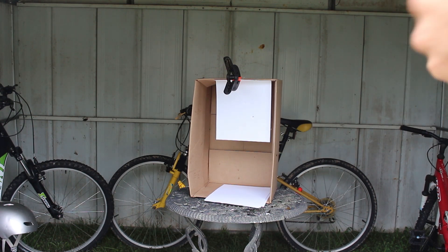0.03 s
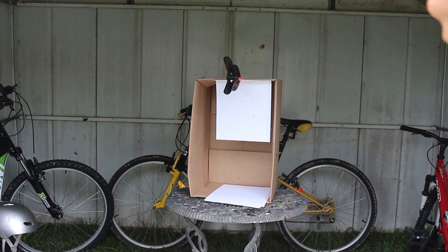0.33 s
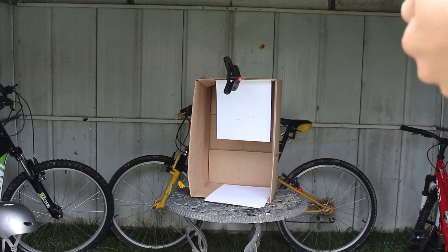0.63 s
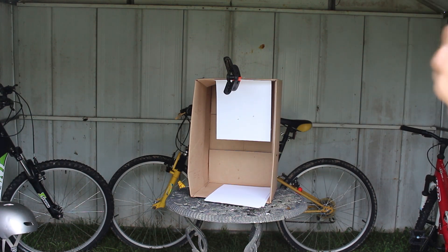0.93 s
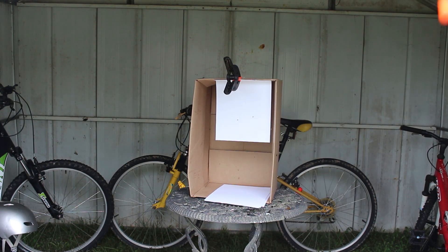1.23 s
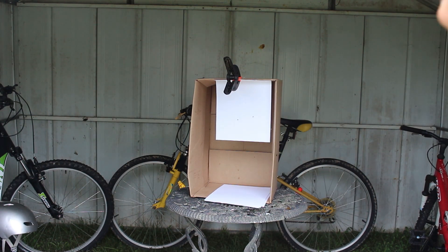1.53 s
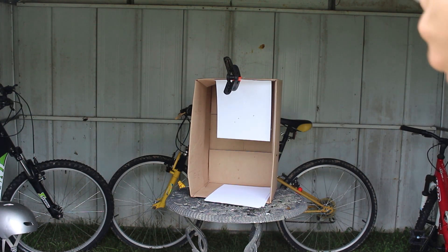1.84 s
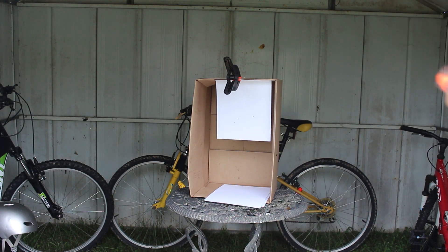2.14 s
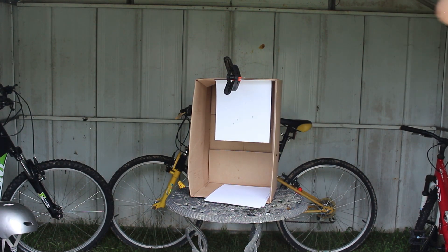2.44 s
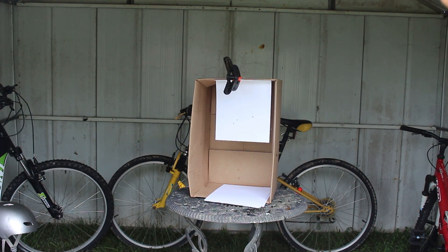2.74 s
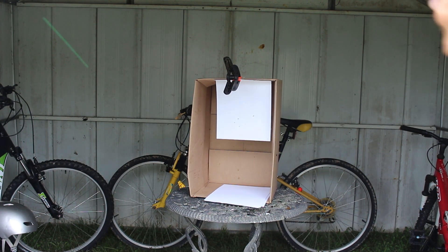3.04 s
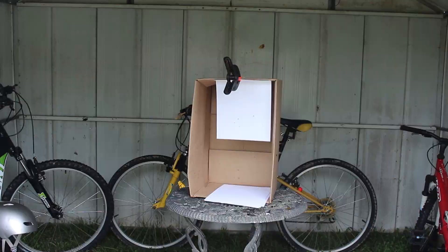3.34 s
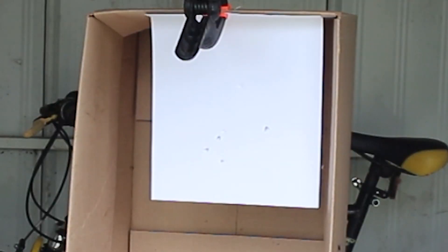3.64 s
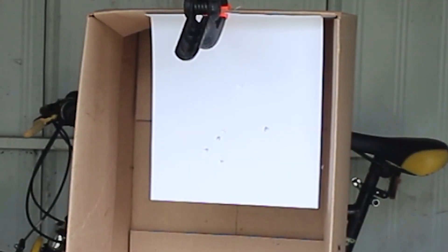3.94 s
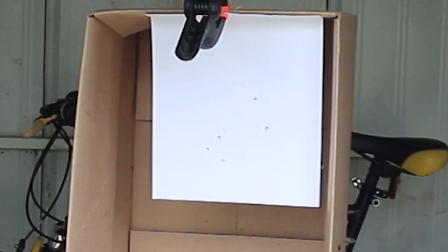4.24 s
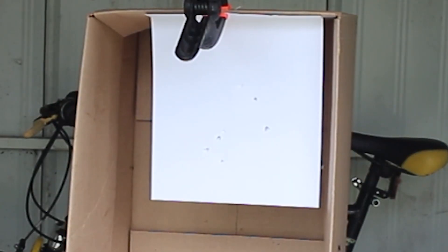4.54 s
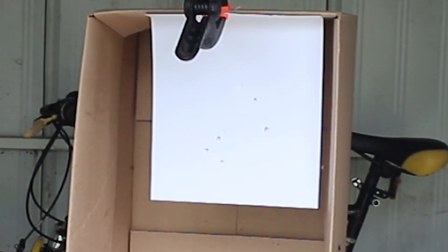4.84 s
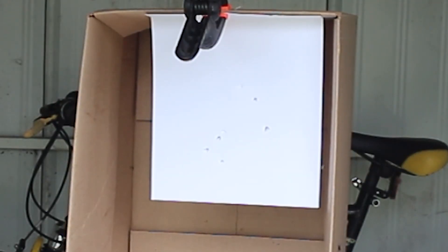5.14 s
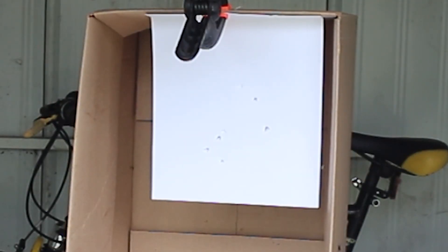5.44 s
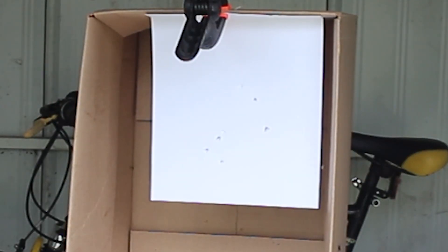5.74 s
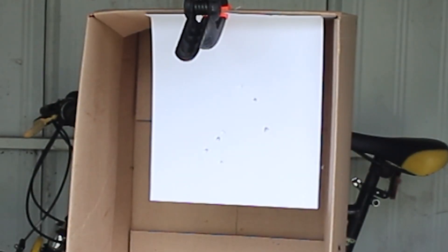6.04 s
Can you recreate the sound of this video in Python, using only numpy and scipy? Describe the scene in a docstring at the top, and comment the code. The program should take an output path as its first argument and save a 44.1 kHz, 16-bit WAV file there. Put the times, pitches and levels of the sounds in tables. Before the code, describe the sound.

A spring BB pistol snaps five times at a steady pace near the microphone, with the plastic clack of its slide being racked after each shot. A few metres away, four pellets crack through paper and cardboard, lightly ringing a metal shed wall. Handling clicks, brief hisses and a small ting fall in between, and the spring buzzes slightly. Low, uneven wind buffeting runs throughout, over a faint outdoor background.

```python
"""Wind buffets the microphone; then, close by, a spring BB pistol fires five times at a paper target in a
cardboard box before a metal shed. Each shot is a pair of impacts: the sear snaps and the piston slams.
Four pellets smack through the box and excite the modes of the shed wall. After each shot the slide is
racked back and rattles home, among small clicks, short hisses and one metallic ting. The ground and wall
reflect these sounds over a faint outdoor background."""
import sys
import numpy as np
from scipy import signal
from scipy.fft import rfft, irfft, next_fast_len
from scipy.io import wavfile
from scipy.ndimage import uniform_filter1d

SR = 44100
rng = np.random.default_rng(int(sys.argv[2]) if len(sys.argv) > 2 else 0)


def wav_record(signal):
    """Record a signal, one row per channel, as 16-bit PCM in the file named by sys.argv[1]."""
    frames = np.transpose(np.atleast_2d(signal))
    bounded = np.clip(frames, -1, 1)
    # unit amplitude maps onto the largest positive 16-bit level
    quanta = np.round(bounded * 32767).astype(np.int16)
    wavfile.write(sys.argv[1], SR, quanta)


N = 273507
TIME = np.arange(N) / SR
AGE = TIME[:SR]  # seconds since the start of an event

# Piston slams. Each row: start in seconds, level in dB.
PISTON_SLAMS = [(0.596, -5), (1.7495, -5.5), (2.9081, -3.5), (4.056, -3.5), (5.227, -2)]
# Spectrum of a shot. Each row: frequency in Hz, gain in dB.
SHOT_SPECTRUM = [(120, -35.5), (200, -4.5), (590, -8), (1060, 1), (2090, -4), (2650, -15), (3020, -5.5),
                 (4040, -8.5), (4430, -4.5), (5840, -12), (6280, -18.5), (7540, -3.5), (10300, -18.5),
                 (13300, -16), (16000, -25.5)]
def shots(flight_s=.0035, snap_db=-11, slam_db=-1):
    """Impact excitation: the sear snaps, the piston flies and slams home, much alike at every shot."""
    out = np.zeros(N)
    snap, slam = burst(.0004, .041), burst(.0025, .009)
    for s, db in PISTON_SLAMS:
        add(out, s - flight_s, undb(db + snap_db) * (snap + .15 * burst(.00052, .0085)))
        add(out, s, undb(db + slam_db) * (slam + .28 * burst(.0018, .015)))
    return colour(out, SHOT_SPECTRUM)


# Pellet blows, on the target and then behind it. Each row: start in seconds, level in dB, wall level in dB.
PELLET_HITS = [(0.6275, -7, -2.5), (.634, -10, -3), (1.7816, -10, 4.5), (1.7872, -12, -6), (2.9419, -9, 5),
               (2.9487, -9, 1), (4.0893, -7.5, -20), (4.093, -11, -7)]
# Spectrum of a pellet blow. Each row: frequency in Hz, gain in dB.
HIT_SPECTRUM = [(120, -17), (350, 3), (620, -2.5), (930, 3), (1300, 1), (2400, -0.5), (2950, 0), (3800, -2),
                (6500, -6), (8700, -3), (10300, -14.5), (12500, -11.5), (16000, -20.5)]
# Modes of the shed wall. Each row: frequency in Hz, level in dB.
SHED_MODES = [(947.5, -66), (1922, -66), (2105, -73.5), (2164, -64.5), (2326, -71), (2374, -81),
              (2439, -69.5)]
def pellets(box_db=-12, rattle_db=-22, ring_db=16, ring_t60=.9):
    """Damping: struck cardboard cracks and shudders briefly, while the sheet wall rattles and rings on."""
    impacts, wall = np.zeros(N), np.zeros(N)
    for s, db, wall_db in PELLET_HITS:
        add(impacts, s, undb(db) * (burst(.00069, .0046) + undb(box_db) * burst(.002, .051)))
        add(impacts, s, undb(wall_db + rattle_db) * fade(.21) * rng.standard_normal(SR))
        for hz, mode_db in SHED_MODES:
            # each blow finds slightly different neighbours among the panel's many modes
            pitch = hz * (1 + .006 * rng.standard_normal())
            mode = fade(ring_t60) * np.sin(2 * np.pi * pitch * AGE)
            add(wall, s, undb(wall_db + ring_db + mode_db) * mode)
    return colour(impacts, HIT_SPECTRUM) + wall


# The slide at its back stop. Each row: start in seconds, level in dB, relative catch level in dB,
# frame resonance in Hz, tilt in dB per octave.
SLIDE_STOPS = [(1.1624, -17, -32, 1470, 1.5), (2.268, -8.5, -14.5, 5840, 0.5), (3.464, -6, -14, 4750, 0),
               (4.583, -4.5, -27, 1380, 0.5), (5.692, -12.5, -42, 4530, 3), (5.8801, -4.5, -14, 2550, 3)]
# Spectrum of the stop. Each row: frequency in Hz, gain in dB.
STOP_SPECTRUM = [(200, -27), (750, -12), (1400, -1.5), (2400, -3), (3200, -6.5), (5200, -4.5), (7000, -12),
                 (8700, -9), (10500, -16), (13000, -13), (16000, -22)]
def slide_stops(lead_s=.0046, frame_q=4, frame_db=1):
    """Resonance: after a light catch the slide hits its stop; the grip decides which frame mode rings."""
    out = np.zeros(N)
    for s, db, catch_db, hz, tilt in SLIDE_STOPS:
        impact = burst(.0013, .011)
        blow = impact + undb(frame_db) * resonate(impact, hz, frame_q)
        add(out, s - lead_s, undb(db + catch_db) * colour(burst(.00068, .02), STOP_SPECTRUM, tilt))
        add(out, s, undb(db - 2) * colour(blow, STOP_SPECTRUM, tilt))
    return out


# The slide running home. Each row: start in seconds, level in dB, latch delay in seconds,
# relative latch level in dB.
SLIDE_RETURNS = [(2.4269, -17, 0.019, 5), (3.6309, -14, .02, -4), (4.749, -12.5, .019, 3),
                 (6.046, -8, 0.023, -5)]
# Spectra of its knocks and scrapes. Each row: frequency in Hz, gain in dB.
KNOCK_SPECTRUM = [(200, -14), (800, -14), (1250, 1.5), (1600, 1), (2100, -1), (3000, -12), (5000, -11),
                  (8500, -14.5), (11000, -29.5), (16000, -25.5)]
SCRAPE_SPECTRUM = [(300, -10), (1500, 4), (3000, -0.5), (5500, -2), (7200, -4), (9000, 5.5), (10500, -7),
                   (13000, -5.5), (16000, -22.5)]
def slide_returns(scrape_lag_s=.012, scrape_db=-3):
    """Impact and sliding friction: the slide knocks a pellet into the breech, scrapes on and latches."""
    knocks, scrapes = np.zeros(N), np.zeros(N)
    for s, db, latch_lag, latch_db in SLIDE_RETURNS:
        add(knocks, s, undb(db - 5) * burst(.00048, .032))
        add(knocks, s + latch_lag, undb(db + latch_db - 2.5) * burst(.0014, .013))
        add(scrapes, s - .0025, undb(db - 17.5) * burst(.024, .08))
        add(scrapes, s + scrape_lag_s, undb(db + scrape_db) * burst(.0011, .018))
    return colour(knocks, KNOCK_SPECTRUM) + colour(scrapes, SCRAPE_SPECTRUM)


# The slide drawn back. Each row: start and length in seconds, rubbing level in dB, catch level in dB.
SLIDE_DRAWS = [(1.052, .108, -50, -26.5), (2.171, 0.09, -46.5, -27), (3.336, 0.13, -49.5, -25),
               (4.467, 0.14, -37, -25), (5.74, 0.15, -43, -19)]
def slide_draws(roughness_db=5):
    """Stick-slip friction: plastic rubs on plastic in a dense run of small catches and slips."""
    out = np.zeros(N)
    for s, length, db, _ in SLIDE_DRAWS:
        slips = undb(roughness_db * np.repeat(rng.standard_normal(SR), 60))[:SR]
        stroke = np.sin(np.pi * np.minimum(AGE / length, 1)) ** .5
        add(out, s, undb(db) * stroke * unit(slips * rng.standard_normal(SR)))
    return colour(out, KNOCK_SPECTRUM)


# Catches passed on every draw. Each row: fraction of the stroke, relative level in dB, treble in dB.
SLIDE_CATCHES = [(0, -5, -22), (0.356, -1, -9.5), (0.481, 1, -14), (.82, -7.5, -11)]
# Clicks of the gun in the hand. Each row: start in seconds, level in dB, treble in dB.
HAND_CLICKS = [(1.313, -28, -16), (1.329, -20, 0), (1.341, -20.5, -23), (1.564, -37, -14),
               (4.2957, -29, -8.5), (5.3991, -30.5, -13.5)]
def clicks(click_db=-7, trigger_lead_s=.063, trigger_db=-32.5, trigger_treble_db=-23):
    """Contact transients: the trigger ticks before each shot, the slide at catches, the gun in the hand."""
    out = np.zeros(N)
    triggers = [(s - trigger_lead_s, trigger_db, trigger_treble_db) for s, _ in PISTON_SLAMS]
    catches = [(s + share * length, draw_db + db, treble_db)
               for s, length, _, draw_db in SLIDE_DRAWS for share, db, treble_db in SLIDE_CATCHES]
    for s, db, treble_db in triggers + catches + HAND_CLICKS:
        add(out, s, undb(db + click_db) * tick(treble_db))
    return out


def handling(from_s=3.8, to_s=6.1, count=12, tick_db=-46, spread_db=3):
    """Random impulses: faint ticks come as the grip shifts."""
    out = np.zeros(N)
    for when, size in rng.uniform(size=(count, 2)):
        s = from_s + when * (to_s - from_s)
        add(out, s, undb(tick_db + spread_db * (2 * size + .5)) * tick(treble_db=-17))
    return out


def tick(treble_db):
    """A damped impact of small plastic parts, dull or bright."""
    top = treble_db - 1
    spectrum = [(600, -12), (1500, -2), (2200, -8), (5000, top), (9000, top - 2), (16000, top - 12)]
    return colour(burst(.0024, .011), spectrum)


# Buzz of the mainspring. Each row: frequency in Hz, gain in dB.
COIL_SPECTRUM = [(900, -14), (1700, 1.5), (2600, -8), (4000, -5.5), (5400, 3), (6400, -0.5), (7300, -10.5),
                 (8600, 3), (10000, -16.5), (13000, -9), (16000, -11.5)]
def mainspring(blows, buzz_db=-19, empty_db=3.5, sing_hz=5350, sing_q=9, sing_db=-3):
    """Travelling waves: blows run up and down the coils, which buzz and, once the gun is empty, sing."""
    empty = TIME > PISTON_SLAMS[-1][0]
    sing = unit(resonate(rng.standard_normal(N), sing_hz, sing_q))
    coils = noise(COIL_SPECTRUM) + undb(sing_db) * empty * sing
    return undb(buzz_db + empty_db * empty) * scatter(blows, coils, t60=.35)


def cavity(blows, hz, q, db, t60):
    """Cavity resonance: enclosed air booms briefly after each blow."""
    resonance = unit(resonate(rng.standard_normal(N), hz, q))
    return undb(db) * scatter(blows, resonance, t60)


# Short hisses. Each row: start in seconds, level in dB, t60 and length in seconds, tilt in dB per octave.
HISS_EVENTS = [(0.653, -25, 0.41, 0.077, -1), (1.131, -36.5, 1.4, 0.081, 0.5),
               (1.319, -34.5, 0.52, 0.091, 1.5), (1.426, -28.5, 0.28, 0.13, 4),
               (2.028, -27.5, 0.57, 0.12, 0.5), (2.558, -26, .23, 0.06, 7), (2.761, -35, 0.42, 0.13, 2),
               (2.991, -28, 0.48, 0.089, -1.5), (4.162, -35, 0.36, 0.014, -1.5)]
# Spectrum of a hiss, and of the ting's strike and rattle. Each row: frequency in Hz, gain in dB.
HISS_SPECTRUM = [(300, -8.5), (900, 3), (1500, 3), (3000, 3.5), (6000, 0.5), (8700, 1.5), (10500, -7.5),
                 (13000, -6), (16000, -14.5)]
def hisses(rise_s=.0037, close_t60=.2):
    """Gated broadband noise: each hiss opens quickly, sinks and then closes."""
    out = np.zeros(N)
    for s, db, t60, length, tilt in HISS_EVENTS:
        envelope = gate(rise_s, length, close_t60) * fade(t60)
        add(out, s, undb(db) * envelope * colour(rng.standard_normal(SR), HISS_SPECTRUM, tilt))
    return out


# Modes of a small metal object. Each row: frequency in Hz, level in dB.
METAL_MODES = [(2239, -29), (2420, -42), (5168, -54), (5776, -44.5), (8250, -26), (8613, -25.5),
               (9620, -34), (11456, -30), (12263, -49), (13587, -49)]
def ting(s=1.916, strike_db=-9, ring_db=1, rattle_db=-21):
    """Beating: something small and metallic is struck, rattles and rings briefly in close mode pairs."""
    out = np.zeros(N)
    add(out, s, undb(strike_db) * colour(burst(.000067, .0012), HISS_SPECTRUM))
    add(out, s, undb(rattle_db) * fade(.23) * colour(rng.standard_normal(SR), HISS_SPECTRUM, tilt=2))
    for hz, db in METAL_MODES:
        pair_hz = hz * (1 + .012 * rng.standard_normal((2, 1)))
        beating = np.sin(2 * np.pi * pair_hz * AGE).sum(axis=0)
        add(out, s, undb(ring_db + db) * fade(.17) * beating)
    return out


# Early reflections. Each row: delay in seconds, gain in dB.
REFLECTIONS = [(.0068, -19.5), (0.0187, -24)]
# Spectra of the bright tail and the lingering tail. Each row: frequency in Hz, gain in dB.
BRIGHT_SPECTRUM = [(200, -4.5), (900, -5), (2000, -2), (5500, 0.5), (9000, 3.5), (16000, -1)]
LINGER_SPECTRUM = [(200, -7), (900, 9), (2400, 8), (4000, 3), (8700, -12), (10500, -18.5), (16000, -34)]
def yard(gun, far, bright_db=-13, linger_db=-20, far_db=-3):
    """Reflection: ground and wall echo the gun; a bright tail dies quickly and a duller one lingers."""
    early = sum(undb(db) * np.interp(TIME - lag, TIME, gun, left=0) for lag, db in REFLECTIONS)
    response = colour(rng.standard_normal(SR), BRIGHT_SPECTRUM) * fade(.2) * np.minimum(AGE / .0087, 1)
    bright = signal.fftconvolve(gun, unit(response) / np.sqrt(SR))[:N]
    linger = scatter(gun + undb(far_db) * far, noise(LINGER_SPECTRUM), t60=.47)
    return early + undb(bright_db) * bright + undb(linger_db) * linger


# Gusts. Each row: start and length in seconds, strength in dB, flutter offset in dB, t60 in seconds.
WIND_GUSTS = [(0.0, .17, -8.5, 3, .7), (0.316, 0.058, -7.5, 1, .3), (0.693, 0.27, -13.5, -1.5, .5),
              (0.944, .2, -7, 0.5, 0.15), (1.193, 0.072, -9, 2, 0.44), (1.888, .13, -10.5, -1, 0.65),
              (2.16, 0.27, -14.5, 0.5, 0.11), (2.577, 0.047, -7.5, -1, 0.59), (2.783, .11, -17, 6.5, 0.15),
              (3.084, .2, -16.5, -4, 0.54), (3.346, .11, -6.5, -4, 0.08), (3.488, 0.25, -11, -8, .3),
              (3.81, .05, -16, -5, .3), (3.986, 0.047, -13.5, -7, 0.31), (4.151, .11, -6, -8, 1),
              (4.57, 0.099, -26, 9.5, 0.75), (4.987, 0.23, -8, -1, 0.17), (5.331, 0.034, -17.5, 7.5, 0.62),
              (5.565, 0.22, -21.5, -7.5, 0.2), (6.04, 0.13, -12.5, -10, 0.18)]
# Spectra of large and small eddies. Each row: frequency in Hz, gain in dB.
RUMBLE_SPECTRUM = [(8.8, -34), (15, 7.5), (38, 0), (76, -2), (132, -9.5), (260, -30.5), (340, -59),
                   (570, -120)]
FLUTTER_SPECTRUM = [(90, -14.5), (170, 10), (250, 2.5), (400, -10), (600, -23.5), (1000, -41.5),
                    (2000, -70.5), (5000, -81.5)]
def wind(breeze_db=-28.5, breeze_flutter_db=-62, flutter_db=-8, buffet_db=3, rise_s=.04, deep_hz=70):
    """Turbulence: gusts rise from a breeze; large eddies rumble on the microphone, small ones flutter."""
    rumble_gain, flutter_gain = np.full(N, undb(breeze_db)), np.full(N, undb(breeze_flutter_db))
    for s, length, db, rough_db, t60 in WIND_GUSTS:
        strength = undb(db) * gate(rise_s, length, t60)
        add(rumble_gain, s, strength)
        add(flutter_gain, s, undb(flutter_db + rough_db) * strength ** 1.472)  # grows faster than rumble
    # smooth air holds only the deepest eddies
    eddies = noise(RUMBLE_SPECTRUM)
    deep = signal.sosfiltfilt(signal.butter(2, deep_hz, fs=SR, output="sos"), eddies)
    turbulence = flutter_gain / (flutter_gain + undb(-47) * rumble_gain ** .5)
    rumble = steady(deep + turbulence * (eddies - deep), .08)
    # flutter gathers where the pressure swings hardest
    swing = uniform_filter1d(rumble ** 2, size=500) ** .4
    flutter = steady(noise(FLUTTER_SPECTRUM) * swing, .1)
    puffs = undb(buffet_db * np.tanh(noise([(6, 0), (13, 0)])))  # several a second
    pressure = puffs * (rumble_gain * rumble + flutter_gain * flutter)
    return np.arcsinh(pressure)  # the strongest puffs overload the microphone softly


# Sharp puffs of wind. Each row: start in seconds, level in dB.
WIND_SLAPS = [(0.3699, -23), (1.104, -22), (1.2585, -21), (5.048, -27.5)]
# Spectrum of a slap. Each row: frequency in Hz, gain in dB.
SLAP_SPECTRUM = [(100, 6), (300, 1.5), (700, -10.5), (1600, -21), (3000, -36.5), (6000, -52.5)]
def slaps():
    """Pressure pulses: the hardest eddies hit the microphone with a dull knock."""
    out = np.zeros(N)
    for s, db in WIND_SLAPS:
        add(out, s, undb(db) * burst(.003, .011))
    return colour(out, SLAP_SPECTRUM)


# Slow rise of the background. Each row: time in seconds, level in dB.
AIR_LEVELS = [(0, -66), (.9, -64.5), (1.7, -59), (4.1, -58), (5.6, -55), (6.2, -47)]
# Spectra of the air and the ticking. Each row: frequency in Hz, gain in dB.
AIR_SPECTRUM = [(200, 4), (900, 1), (1500, -1.5), (3000, -14.5), (3700, -7.5), (5800, -13.5), (6800, -11),
                (7400, -6), (8600, -2), (9800, -20), (12200, -12), (16000, -35.5)]
INSECT_SPECTRUM = [(9500, -19.5), (12000, 1.5), (14500, -3), (16000, -16)]
def background(insect_db=-17, spread_db=6):
    """Ambient noise: faint air with a high band of hiss and a thin ticking, likely distant insects."""
    ticking = undb(spread_db * np.repeat(rng.standard_normal(N // 300 + 1), 300))[:N]
    air = noise(AIR_SPECTRUM) + undb(insect_db) * unit(ticking * noise(INSECT_SPECTRUM))
    return air * undb(np.interp(TIME, *np.transpose(AIR_LEVELS)))


def undb(db):
    """Decibels to amplitude ratio."""
    return 10 ** (np.asarray(db) / 20)


def unit(x):
    """Normalisation to rms 1."""
    return x / np.sqrt(np.mean(x ** 2))


def fade(t60):
    """Exponential decay, one second long, falling 60 dB every t60 seconds."""
    return 1000. ** (-AGE / t60)


def gate(rise, length, t60):
    """An envelope that opens over rise seconds, holds until length seconds, then decays."""
    return np.minimum(AGE / rise, 1) * 1000. ** (-np.maximum(AGE - length, 0) / t60)


def add(track, s, sound):
    """Superposition: mix a sound into a track at s seconds."""
    start = max(int(s * SR), 0)
    track[start:start + len(sound)] += sound[:N - start]


def resonate(x, hz, q):
    """A second-order resonator of bandwidth hz / q."""
    return signal.lfilter(*signal.iirpeak(hz, q, fs=SR), x)


def colour(x, points, tilt=0):
    """Minimum-phase filter through (Hz, dB) points, tilted in dB per octave; keeps white noise's power."""
    size = 2 * next_fast_len(len(x) // 2 + 2048)
    octave = np.log2(np.maximum(np.arange(size // 2 + 1) * SR / size, 1))
    hz, db = np.transpose(points)
    corners = np.log2(hz)
    outside = np.abs(octave - np.clip(octave, corners[0], corners[-1]))
    gain = unit(undb(np.interp(octave, corners, db) + tilt * octave - 24 * outside))
    # folding the cepstrum makes the filter causal
    cepstrum = irfft(np.log(gain))
    cepstrum[1:size // 2] *= 2
    cepstrum[size // 2 + 1:] = 0
    return irfft(rfft(x, size) * np.exp(rfft(cepstrum)))[:len(x)]


def noise(points):
    """Stationary coloured noise of rms 1."""
    return unit(colour(rng.standard_normal(N), points))


def steady(x, span):
    """Division by the running rms evens out swells slower than span seconds."""
    return x / np.sqrt(uniform_filter1d(x ** 2, max(int(span * SR), 2)) + 1e-12)


def burst(hold, t60):
    """Contact noise: a dense broadband rattle, full for hold seconds, then dying away."""
    envelope = 1000. ** (-np.maximum(AGE[:SR // 8] - hold, 0) / t60)
    spectrum = rfft(envelope * rng.standard_normal(len(envelope)))
    even = irfft(spectrum / np.sqrt(np.abs(spectrum)), len(envelope))  # hard contact: few spectral gaps
    return steady(even, .0007) * envelope


def scatter(x, carrier, t60, build_s=.0093):
    """Diffuse reverberation: many reflections smear energy into a dying tail of the carrier's colour."""
    decay = (fade(t60) * np.minimum(AGE / build_s, 1)) ** 2
    energy = signal.fftconvolve(x ** 2, decay / decay.sum())[:N]
    return np.sqrt(np.maximum(energy, 0)) * carrier


def scene():
    """Superposition of the near gun with its hollow grip, the open box a few metres off, wind and air."""
    blows = shots() + slide_stops()
    gun = blows + slide_draws() + slide_returns() + clicks() + handling()
    grip = cavity(gun, hz=1580, q=3.3, db=-18, t60=.066)
    target = pellets()
    box = cavity(target, hz=950, q=7.2, db=-12.5, t60=.33)
    others = target + box + hisses() + ting()
    mix = gun + grip + mainspring(blows) + others + yard(gun, others) + wind() + slaps() + background()
    return mix[None]


def record(dry, follow_s=.049, knee_db=-7, squeeze=.47, makeup_db=.85, top_hz=16000):
    """Compression: the recorder lowers its gain in strong puffs, clips loud blows and cuts the top."""
    pole = np.exp(-1 / (follow_s * SR))
    power = signal.lfilter([1 - pole], [1, -pole], dry ** 2)
    gain = undb(makeup_db) * (1 + power / undb(knee_db) ** 2) ** -squeeze
    clipped = np.clip(gain * dry, -1, 1)
    return signal.sosfilt(signal.ellip(8, .2, 70, top_hz, fs=SR, output="sos"), clipped)


dry = scene()
out = record(dry)
wav_record(out)
```